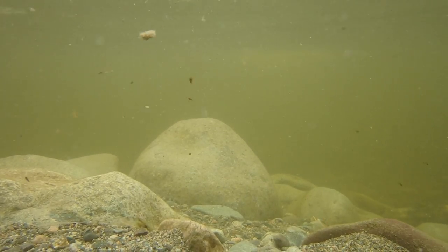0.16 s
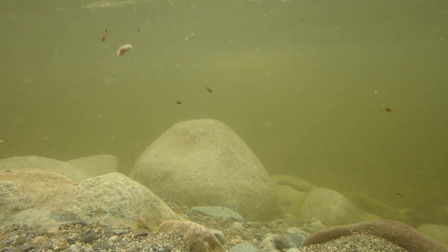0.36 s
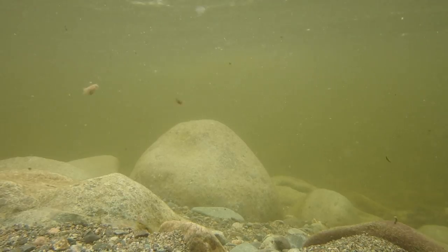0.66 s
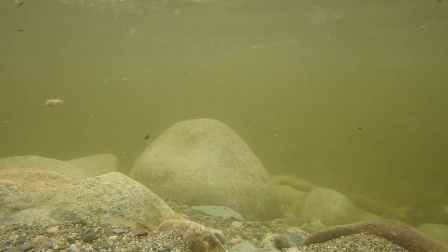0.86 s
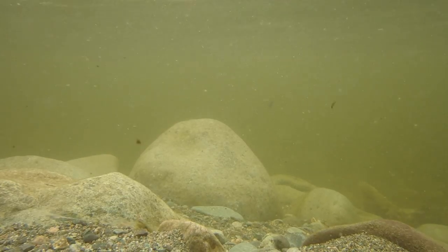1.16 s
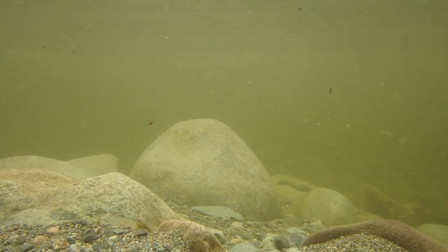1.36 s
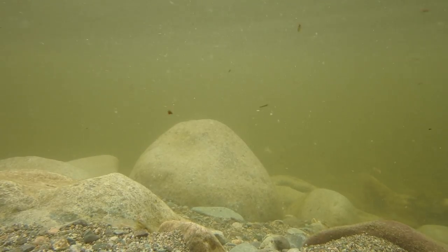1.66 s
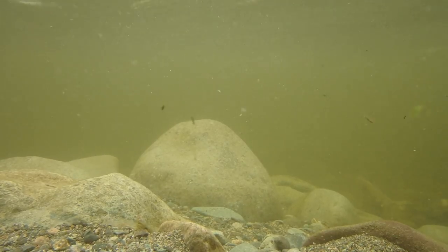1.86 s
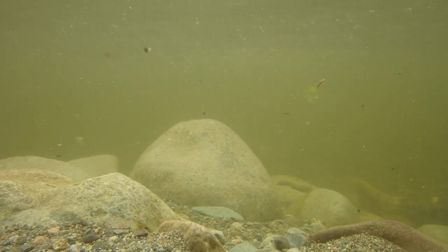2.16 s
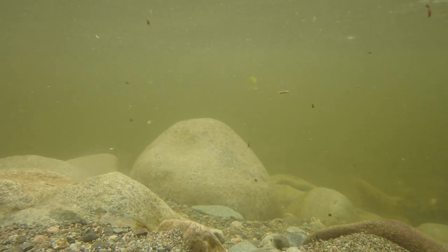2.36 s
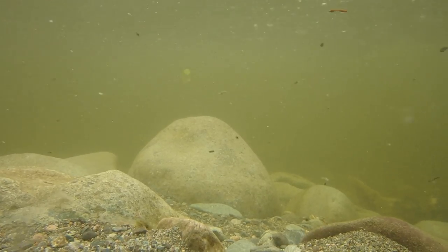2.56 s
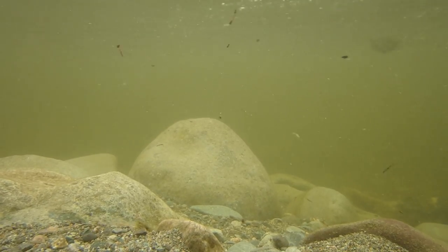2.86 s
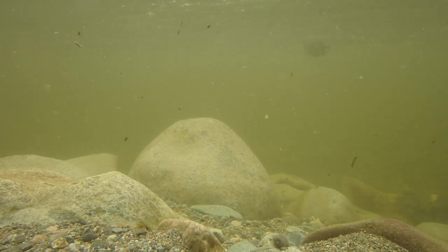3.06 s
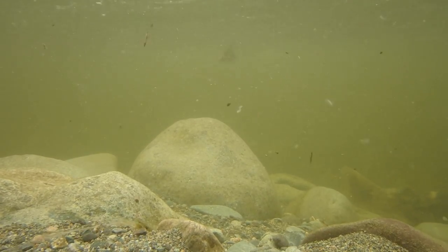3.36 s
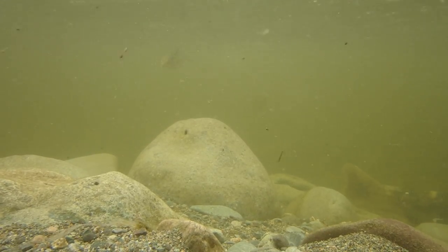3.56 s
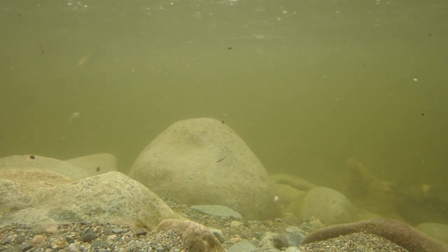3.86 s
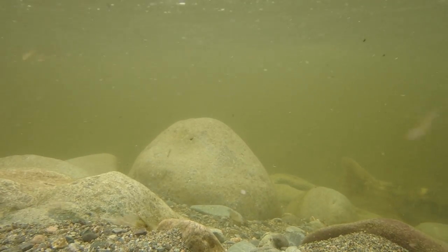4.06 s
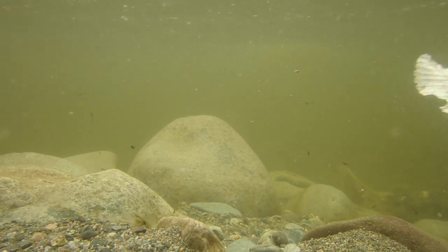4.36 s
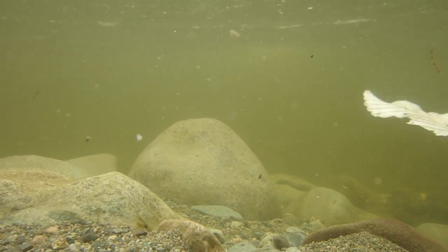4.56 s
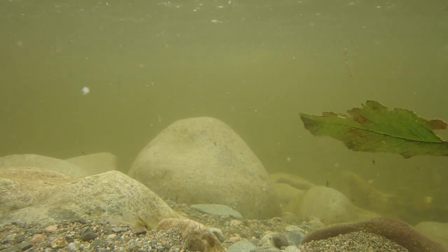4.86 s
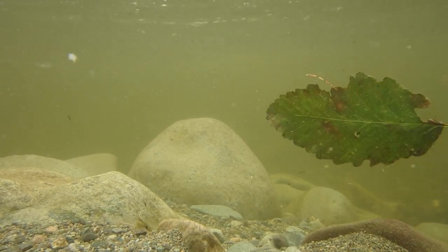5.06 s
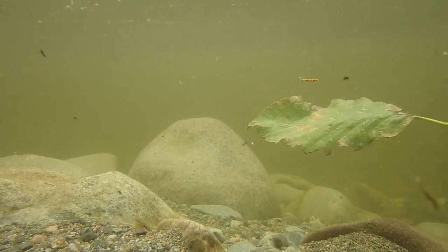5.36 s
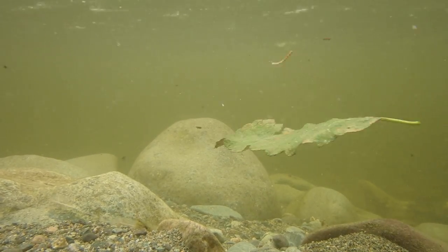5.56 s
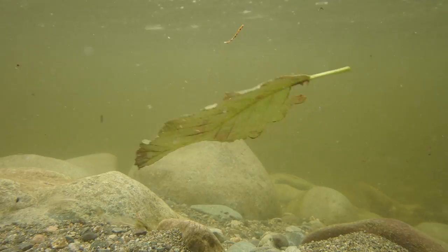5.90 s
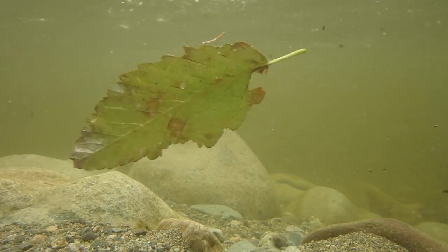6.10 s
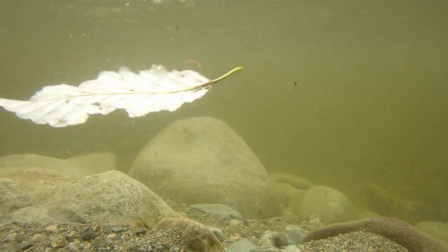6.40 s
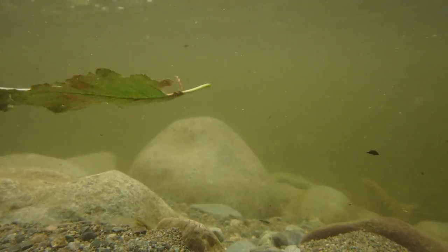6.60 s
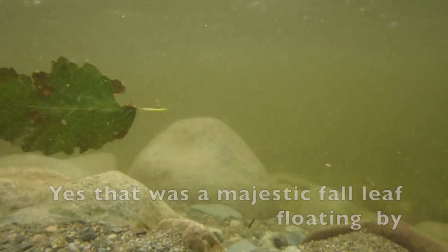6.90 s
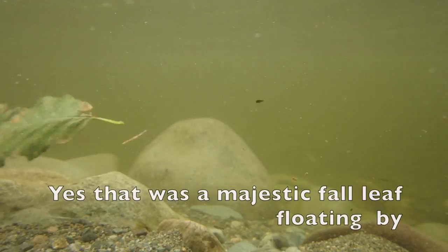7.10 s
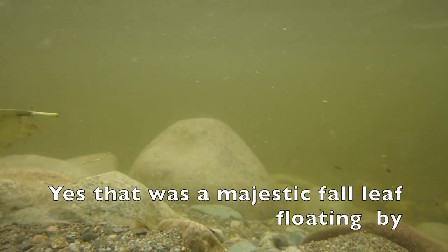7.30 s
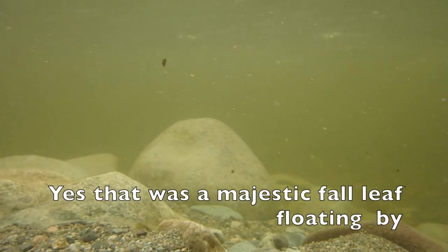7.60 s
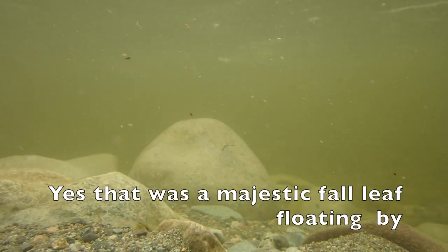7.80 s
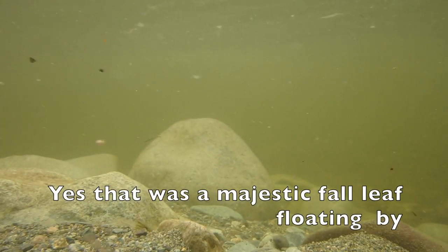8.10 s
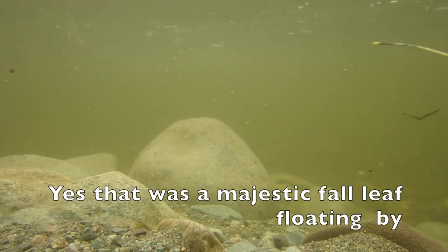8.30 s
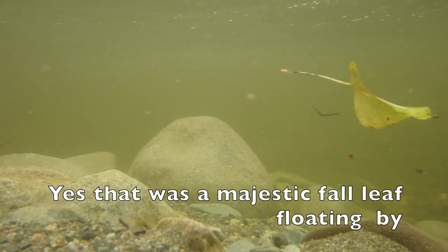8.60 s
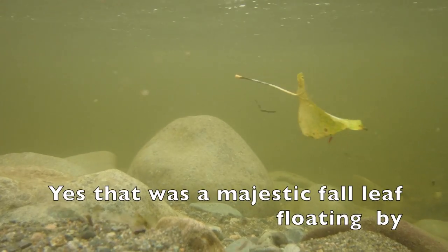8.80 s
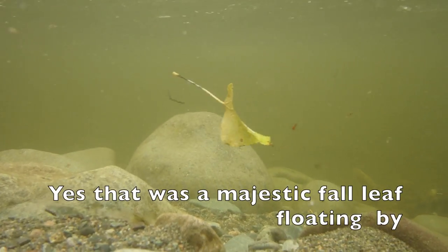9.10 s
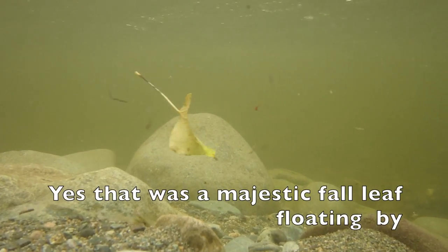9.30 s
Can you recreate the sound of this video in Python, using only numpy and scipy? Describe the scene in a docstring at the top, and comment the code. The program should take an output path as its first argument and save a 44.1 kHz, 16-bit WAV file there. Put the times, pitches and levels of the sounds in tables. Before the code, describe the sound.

Submerged river flow washes and surges, buffeting the microphone case with dull blows while drifting sand patters and small stones click sharply.

```python
"""The current of a river rumbles, washes and churns round a watertight case on the gravel bed: shaped noise
that surges, with eddies thumping the case as short low swings and bigger ones shoving it.
Drifting sand patters and bits of gravel tick on the ringing shell, over a steady hiss.
Tiny bubbles fizz in blips and a few lone bubbles ring with a rising pitch.
The recorder's limiter ducks everything after the hardest blows and creeps back."""
import sys
import numpy as np
from scipy import signal
from scipy.fft import rfft, irfft, next_fast_len
from scipy.io import wavfile
from scipy.ndimage import uniform_filter1d, minimum_filter1d

SR = 44100
rng = np.random.default_rng(int(sys.argv[2]) if len(sys.argv) > 2 else 0)


def transcribe(u):
    """Save the signal u as a 16-bit wav file named by the first command-line argument.

    u: samples, shape (n,) or (channels, n), limited to [-1, 1]; the rate is SR.
    q: integer samples, one column per channel.
    """
    v = np.clip(np.atleast_2d(u).T, -1, 1)
    q = np.round(v * 32767).astype(np.int16)
    wavfile.write(sys.argv[1], SR, q)


N = 416744
TIME = np.arange(N) / SR  # s
CUTOFF_HZ = 15600
SHELL_BAND_HZ = (1970, 11600)  # the shell passes little outside this band

# Steady current about its usual strength: t/s, level/dB
FLOW = [(0, 2), (0.4, 4), (0.7, 2), (1.1, -0.5), (1.7, 2.5), (2.2, -3), (2.95, -0.5), (3.5, 1.5),
        (3.9, -3.5), (4.8, 1.5), (5.3, -1.5), (5.7, 1.5), (6.3, 0), (7.0, 2.5), (7.9, 1.5), (8.5, 3.5),
        (8.7, 1.5), (9.4, 1)]
# Surges that build up and collapse: crest t/s, build-up/s, collapse/s, flow height/dB, churn height/dB
SURGES = [(0.16, 0.14, 0.083, 7.5, 15.5), (0.52, 0.082, 0.08, 10, 8), (0.761, 0.048, 0.062, 10.5, 11),
          (0.9, 0.17, 0.08, 4, 8), (2.54, 0.26, 0.092, 18, 21.5), (2.75, 0.21, 0.058, 11, 14.5),
          (3.12, 0.1, 0.029, 4.5, 1), (4.35, 0.11, 0.11, 17.5, 19), (4.602, 0.066, 0.072, 14.5, 15.5),
          (4.91, 0.052, 0.023, 7.5, 14.5), (5.53, 0.052, 0.31, 4.5, 5), (5.79, 0.017, 0.057, 3.5, 8),
          (6.46, 0.07, 0.066, 4.5, 8.5), (7.11, 0.15, 0.075, 10.5, 7.5), (7.63, 0.11, 0.15, 3.5, 6),
          (8.4, 0.042, 0.4, 8, 11), (9.03, 0.32, 0.093, 21.5, 22), (9.23, 0.09, 0.067, 7.5, 12.5),
          (9.44, 0.11, 0.1, 12.5, 14)]
# Slow buffets that rock the case: middle t/s, half length/s, level/dB
BUFFETS = [(0.38, 0.13, -32), (0.774, 0.04, -36), (1.65, 0.24, -39), (4.6, 0.05, -45), (7.9, 0.063, -27.5),
           (8.35, 0.1, -47), (9.13, 0.17, -13)]
# Eddies striking the case: t/s, level/dB, f/Hz, knock level relative to the thump/dB
THUMPS = [(0.116, -8.5, 167, -16), (0.473, -1.5, 167, -14.5), (0.533, 1.5, 185, -30),
          (0.758, 11, 158, -15.5), (2.468, -2, 142, -29), (2.523, 1, 160, -27), (2.561, 3, 163, -28),
          (2.666, -2, 156, -32), (2.691, -7, 170, -25), (2.743, -3, 172, -12), (3.075, 1.5, 190, -34),
          (3.119, -1, 169, -14.5), (4.326, 2, 153, -18.5), (4.36, 3, 163, -14), (4.418, -5, 163, -32),
          (4.584, 7, 145, -31), (4.641, -3.5, 172.4, -18), (5.52, -11, 158, -14), (5.79, -17, 173, -9),
          (6.629, -12.5, 214, -18), (7.085, -0.5, 160, -7.5), (7.12, 3.5, 164.5, -12),
          (8.387, 13.5, 157, -16), (8.662, 5, 194, -48), (8.695, 0, 188, -38), (8.714, 0, 198, -40),
          (8.844, 1, 184, -16), (8.941, 2.5, 162, -8), (8.999, 9.5, 151, -22), (9.041, 1.5, 187, -10),
          (9.431, 7.5, 150.3, -13)]
# Slow heavy shoves of the water: t/s, level/dB, f/Hz
LURCHES = [(8.572, -6, 78), (9.143, -2.5, 33.3), (9.23, 1.5, 33.3)]
# Amount of sand carried past the shell: t/s, level/dB
SAND = [(0.0, -41.5), (0.7, -43.5), (1.3, -45), (1.8, -43), (2.2, -46.5), (2.8, -41.5), (3.3, -44.5),
        (3.55, -40.5), (3.8, -44.5), (4.15, -41.5), (4.8, -45.5), (5.25, -43), (5.68, -38.5), (6.3, -49),
        (7.1, -48), (8.3, -44.5), (9.0, -45), (9.4, -48.5)]
# Gravel hitting the shell: t/s, ring level/dB, snap (brightness)/dB
TICKS = [(1.3392, -26, -16), (1.8276, -8.5, -11.5), (2.0075, -16.5, -21), (2.0825, -9.5, -24),
         (2.293, -0.5, -5), (2.3428, -6, -22), (2.8058, -9, -26), (3.0292, -12.5, -39), (3.118, -18, -22),
         (3.163, -16.5, -20.5), (3.2899, -1.5, -5), (3.403, -15.5, -25), (3.42, -18, -19),
         (3.5525, -7, -13), (3.6172, -12, -15), (3.6364, -15.5, -22), (3.8166, -17, -24),
         (3.8431, -17, -22.5), (4.0484, -18.5, -24), (4.121, -16.5, -22), (4.5358, -12, -13.5),
         (4.7274, -25, -22), (5.1866, -32, -21.5), (5.5713, -22, -30), (5.79, -19.5, -38),
         (5.893, -18.5, -20), (6.2382, -18.5, -21), (6.2759, -20, -22.5), (6.5233, -31, -21),
         (6.9043, -28, -20.5), (6.958, -26, -18), (7.2225, -18, -24), (7.573, -33, -22.5),
         (7.6986, -28, -20.5)]
# Lone small bubbles: t/s, level/dB, starting f/Hz
BUBBLES = [(4.972, -37, 1570), (7.927, -33, 2820), (8.037, -35, 3240), (8.327, -37, 1370),
           (8.648, -34, 1570), (8.733, -29, 2140)]
# Tiny bubbles by pitch: f/Hz, relative level/dB
FIZZ = [(4300, -5.5), (5500, -6), (6600, -3.5), (7700, 2), (9000, -7), (11000, -3)]
# Ringing modes of the shell: f/Hz, width/Hz, relative level/dB, right side level/dB, right side lag/rad
SHELL = [(2360, 330, -14, -2, 0.2), (2900, 440, -15, 1.5, -1.4), (3182, 107.4, 1, -0.5, -0.77),
         (3750, 345, -3.5, -9.5, 0.95), (4740, 410, -19.5, -35, 4), (5420, 470, -13.5, -2.5, -2),
         (6840, 92, -14.5, 0, -2.5), (7400, 500, -16, -2, 3), (7990, 1400, -15.5, -1.5, 4)]
MAIN_MODE_HZ, MAIN_MODE_WIDTH_HZ = SHELL[2][:2]
# Dull modes of the case under a sharp eddy: f/Hz, width/Hz, relative level/dB
KNOCK = [(475, 106, 4.5), (820, 100, -39), (1260, 460, -15)]
# Noise colours, low to high; only the shape counts: f/Hz, relative level/dB
BUFFET_COLOUR = [(12, -17), (20, -6), (33, -1), (44, 0), (58, -8), (90, -35)]
DEEP_COLOUR = [(35, -35), (55, -9), (76, 0.5), (105, -4), (140, -7.5), (220, -39)]
RUMBLE_COLOUR = [(60, -23.5), (105, -2.5), (140, 0.5), (175, 0.5), (230, -5), (310, -8.5), (420, -23),
                 (700, -43)]
WASH_COLOUR = [(230, -3.5), (380, -2.5), (520, 1), (700, -8.5), (950, -15.5), (1400, -31), (2500, -94)]
CHURN_COLOUR = [(600, 6), (950, -2.5), (1400, 0.5), (1750, -5.5), (2400, 0), (3200, -20), (6000, -31)]
HISS_COLOUR = [(1500, -9), (2400, -2.5), (3400, 13.5), (4700, -4), (5700, -3), (7600, 1.5), (9500, -1.5),
               (12000, 1.5), (14200, -3), (15200, -30)]


def from_db(db):
    """Decibels to gain."""
    return 10 ** (np.asarray(db) / 20)


def rms_one(x):
    """Scale to rms 1."""
    return x / np.sqrt(np.mean(np.abs(x) ** 2) + 1e-20)


def level_curve(rows):
    """Straight lines in dB between the points of a table."""
    t, db = np.transpose(rows)
    return np.interp(TIME, t, db)


def bell(t, half_s):
    """Smooth rise and fall around a moment, height 1."""
    return np.exp(-np.minimum(((TIME - t) / half_s) ** 2, 20))


def drift(corner_hz):
    """Random wander of rms 1: noise through two equal one-pole lowpasses, drawn at every 40th sample."""
    pole = np.exp(-2 * np.pi * corner_hz * 40 / SR)
    noise = rng.standard_normal(N // 40 + 2002)
    slow = signal.lfilter([1], [1, -2 * pole, pole * pole], noise)[2000:]  # skip the filter's start
    return np.interp(np.arange(N) / 40, np.arange(len(slow)), rms_one(slow))


def coloured(x, colour):
    """Shape the spectrum of a signal; rms 1."""
    size = next_fast_len(N)
    hz, db = np.transpose(colour)
    bins_hz = np.arange(size // 2 + 1) * SR / size
    # the +1 keeps the logarithm finite at 0 Hz
    gain_db = np.interp(np.log(bins_hz + 1), np.log(hz), db, left=-90, right=-120)
    return rms_one(irfft(rfft(x, size) * from_db(gain_db), size)[..., :N])


def turbulence(colour, lumpy_db, lump_hz):
    """Pressure noise that comes in lumps as small eddies pass; rms 1."""
    lumps = from_db(lumpy_db * drift(lump_hz))
    return coloured(rng.standard_normal(N) * lumps, colour)


def ring(clicks, hz, width_hz):
    """One resonance: a unit click starts a dying complex tone of height 1."""
    pole = np.exp((2j * hz - width_hz) * np.pi / SR)
    return signal.lfilter([1], [1, -pole], clicks + 1e-18)


def clicks_at(t, db):
    """Single-sample clicks at the given times and levels."""
    out = np.zeros(N)
    at = np.clip(np.round(t * SR).astype(int), 0, N - 1)
    out[at] = from_db(db)
    return out


def grains(usual_per_s, spread_db, clumps_db=3.0):
    """Random impacts in flurries, many small and a few large; rms 1."""
    size_db = spread_db * np.minimum(rng.exponential(1, N), 4)
    sizes = from_db(size_db) * rng.choice([-1, 1], N)
    density_per_s = usual_per_s * from_db(clumps_db * drift(20))
    return rms_one(sizes * (rng.random(N) < density_per_s / SR))


def varied(clicks, spread_db):
    """Every impact lands on another spot of the shell and so feeds a mode with a strength of its own."""
    out, at = clicks.copy(), np.flatnonzero(clicks)
    out[at] *= from_db(spread_db * rng.uniform(-1, 1, N)[at])
    return out


def later(x):
    """Sound reaches the left microphone 45 microseconds after the right."""
    return np.interp(TIME - 45e-6, TIME, x)


def shell(drive):
    """The shell rings; drive(hz) gives a mode's clicks, and each side hears the mode in its own phase."""
    out = np.zeros((2, N))
    for k, (hz, width_hz, db, right_db, lag_rad) in enumerate(SHELL):
        # wide modes die sooner, so they start higher; neighbours start with opposite sign
        start = from_db(db) * width_hz / MAIN_MODE_WIDTH_HZ * (-1) ** k
        tone = ring(drive(hz), hz, width_hz) * start
        out[0] += tone.imag
        out[1] += (tone * from_db(right_db) * np.exp(-1j * lag_rad)).imag
    band = signal.butter(3, SHELL_BAND_HZ, "band", fs=SR, output="sos")
    return signal.sosfilt(band, out)


def surge_height():
    """Each surge climbs and falls evenly in dB; returns its height for the flow and for the churn."""
    flow_db, churn_db = np.zeros(N), np.zeros(N)
    for crest, build_s, collapse_s, height_db, churn_height_db in SURGES:
        shape = np.interp(TIME, [crest - build_s, crest, crest + collapse_s], [0, 1, 0])
        flow_db += height_db * shape
        churn_db += churn_height_db * shape
    return flow_db, churn_db


def rocking(calm_db=-47.0):
    """Gain of the slow pressure swings: a calm level, and a bell-shaped rise for each buffet."""
    return from_db(calm_db) + sum(from_db(db) * bell(t, half_s) for t, half_s, db in BUFFETS)


def fizz(level_db=-49.5, follows_sand=0.64, cycles=6, flurry_db=2.5,
         right_db=-4.0, right_lag_rad=1.8, pitches=14):
    """Tiny bubbles travel with the sand in flurries, each a blip of a millisecond or two at its own pitch."""
    births = grains(usual_per_s=700, spread_db=4.0) * from_db(flurry_db * drift(40))
    pitch_of = rng.integers(0, pitches, N)  # deals each birth one of the pitches
    known_hz, known_db = np.transpose(FIZZ)
    out = 0
    for k, hz in enumerate(np.geomspace(known_hz[0], known_hz[-1], pitches)):
        width_hz = hz / cycles
        # through the resonance twice: the blip swells and fades without a click
        once = ring(births * (pitch_of == k), hz, width_hz)
        blips = ring(once, hz, width_hz) * hz
        out = out + from_db(np.interp(hz, known_hz, known_db)) * blips
    right = out * from_db(right_db) * np.exp(-1j * right_lag_rad)
    both = rms_one(np.array([out.imag, right.imag]))
    sand_db = level_curve(SAND)
    return from_db(level_db + follows_sand * (sand_db - sand_db.mean())) * both


def bubbles(width_hz=40, rise_per_s=5.0):
    """A bubble rings briefly, a dying sine with its pitch creeping upward."""
    out = np.zeros(N)
    for t, db, hz in BUBBLES:
        span = slice(int(t * SR) + 1, int(t * SR) + SR // 10)
        age = TIME[span] - t
        cycles = hz * age * (1 + rise_per_s * age / 2)
        out[span] += from_db(db) * np.exp(-np.pi * width_hz * age) * np.sin(2 * np.pi * cycles)
    return out


def sand(patter_db=-0.5, hiss_db=-49.0, hiss_shared_db=-7.5, stirred_by_surge=0.38):
    """Grains, stirred up by each surge, ring the shell over a steady hiss partly shared by both sides."""
    flow_surge_db, _ = surge_height()
    sand_db = level_curve(SAND) + stirred_by_surge * flow_surge_db
    impacts = grains(usual_per_s=600, spread_db=4.5)
    patter = rms_one(shell(lambda hz: varied(impacts, spread_db=8.5)))
    left, right, shared = coloured(rng.standard_normal((3, N)), HISS_COLOUR)
    hiss = np.array([left, right]) + from_db(hiss_shared_db) * np.array([later(shared), shared])
    return from_db(sand_db + patter_db) * patter + from_db(hiss_db) * hiss


def gravel(level_db=-3.5, even_snap_db=-4.0, tilt_per_octave=0.93, bounce_db=-6.0,
           crack_db=7.0, crack_hz=13400, crack_width_hz=2400,
           tap_db=0.5, tap_hz=1300, tap_width_hz=900):
    """A snappier hit excites the high modes more; a thin crack and a dull tap grow steeply with snap."""
    t, ring_db, snap_db = np.transpose(TICKS)
    # at even_snap_db against the ring, all modes are struck alike
    tilt_db = (snap_db - ring_db - even_snap_db) * tilt_per_octave
    bounce_t = t + rng.uniform(.0006, .0025, len(t))

    def drive(hz):
        """First touch and a quick bounce, tilted from the main mode upward."""
        octaves = max(np.log2(hz / MAIN_MODE_HZ), 0)
        db = ring_db + level_db + tilt_db * octaves
        touch = varied(clicks_at(t, db), spread_db=4.0)
        bounce = varied(clicks_at(bounce_t, db + bounce_db), spread_db=3.5)
        return touch + bounce

    cracks = clicks_at(t, crack_db + 3 * snap_db)
    taps = clicks_at(t, tap_db + 2 * snap_db)
    # the crack swells over a few cycles, so it stays in the top band
    crack = ring(ring(cracks, crack_hz, crack_width_hz), crack_hz, crack_width_hz)
    crack = crack * (np.e * np.pi * crack_width_hz / SR)  # envelope back to the height of the click
    return shell(drive) + crack.imag + ring(taps, tap_hz, tap_width_hz).imag


def lurches(half_s=0.01):
    """A big eddy pushes the case away and lets it swing back: a low cosine under a bell."""
    return sum(from_db(db) * bell(t, half_s) * np.cos(2 * np.pi * hz * (TIME - t))
               for t, db, hz in LURCHES)


def thumps(swell_s=0.0042, knock_delay_s=0.002018, knock_db=-0.5, low_cut_hz=45):
    """An eddy swings the case for three or four cycles; a sharp one also knocks its dull modes."""
    swings = np.zeros(N)
    for t, db, hz, _ in THUMPS:
        span = slice(int(t * SR) + 1, int(t * SR) + SR // 10)
        age = TIME[span] - t
        envelope = age / swell_s * np.exp(1 - age / swell_s)
        swings[span] += from_db(db) * envelope * np.sin(2 * np.pi * hz * age)
    t, db, _, sharp_db = np.transpose(THUMPS)
    blows = clicks_at(t + knock_delay_s, db + sharp_db + knock_db)
    knocks = sum(from_db(mode_db) * ring(blows, hz, width_hz).imag for hz, width_hz, mode_db in KNOCK)
    low_cut = signal.butter(2, low_cut_hz, "high", fs=SR, output="sos")
    return signal.sosfilt(low_cut, swings + knocks)


def current(deep_follows=0.097, wash_follows=0.9, churn_follows=1.13,
            churn_apart_db=-4.5, deep_buffet_db=-2.5):
    """Buffets and a deep roll rock the case; rumble, mid wash and rough churn grow with the flow."""
    steady_db = level_curve(FLOW)
    surge_db, churn_surge_db = surge_height()
    flow_db = steady_db + surge_db
    swing = rocking()
    buffet = swing * turbulence(BUFFET_COLOUR, lumpy_db=4.5, lump_hz=6.7)
    deep_gain = from_db(deep_follows * flow_db - 29.5) + from_db(deep_buffet_db) * swing
    deep = deep_gain * turbulence(DEEP_COLOUR, lumpy_db=1.1, lump_hz=5.5)
    rumble = from_db(flow_db - 27.5) * turbulence(RUMBLE_COLOUR, lumpy_db=2.0, lump_hz=18)
    wash = from_db(wash_follows * flow_db - 38.0) * turbulence(WASH_COLOUR, lumpy_db=1.97, lump_hz=42)
    # the churn is fine enough for each side of the case to feel some of its own
    shared, apart = (turbulence(CHURN_COLOUR, lumpy_db=2.5, lump_hz=106) for _ in range(2))
    churn_gain = from_db(churn_follows * steady_db + churn_surge_db - 52.0)
    churn = churn_gain * (shared + from_db(churn_apart_db) * np.array([apart, -apart]))
    return buffet + deep + rumble + wash + churn


def scene():
    """Current, blows and lone bubbles reach both sides, the left a little louder and later; shell and fizz join."""
    left, right = bubbles() + lurches() + thumps() + current()
    water = np.array([later(left), right]) * from_db([[.9], [-.9]])
    return fizz() + sand() + gravel() + water


def limiter(x, ceiling=0.88, release_db_per_s=10.5, treble_sense=1.64):
    """Clamps both sides at once on peaks and sharp edges, then recovers steadily in dB."""
    edges = treble_sense * np.abs(np.diff(x, prepend=0))
    sensed = np.maximum(np.abs(x), edges).max(axis=0)
    over_db = 20 * np.log10(np.maximum(sensed / ceiling, 1))
    release_db = release_db_per_s * TIME
    cut_db = np.maximum.accumulate(over_db + release_db) - release_db
    # hold the deepest cut nearby, then round its corners
    gain_db = uniform_filter1d(minimum_filter1d(-cut_db, size=25), size=25)
    return x * from_db(gain_db)


def record(dry, notch_width_hz=70):
    """Limiter, a row of narrow notches in the recorder's response, and a cut top."""
    out = limiter(dry)
    for hz in 1024 * np.arange(2, 7):
        out = signal.lfilter(*signal.iirnotch(hz, hz / notch_width_hz, fs=SR), out)
    top_cut = signal.butter(18, CUTOFF_HZ, fs=SR, output="sos")
    return signal.sosfilt(top_cut, out)


dry = scene()
out = record(dry)
transcribe(out)
```